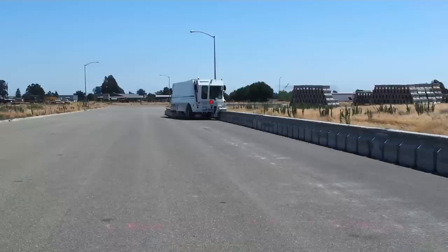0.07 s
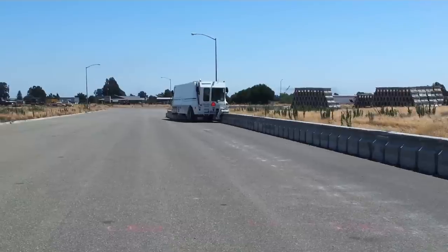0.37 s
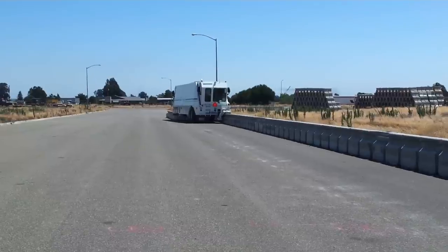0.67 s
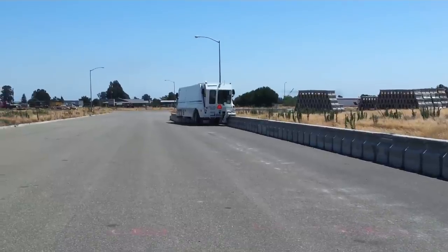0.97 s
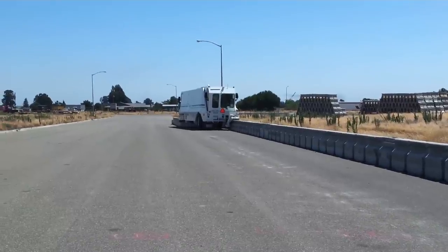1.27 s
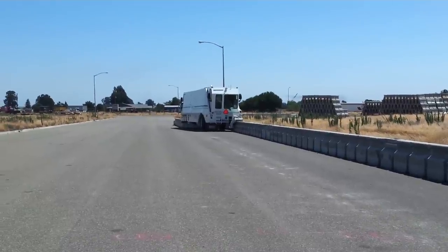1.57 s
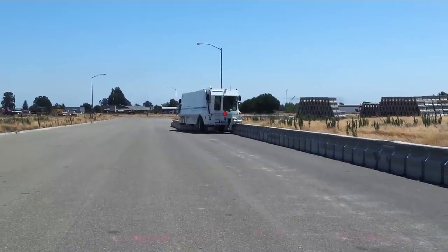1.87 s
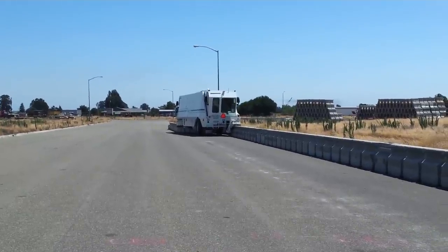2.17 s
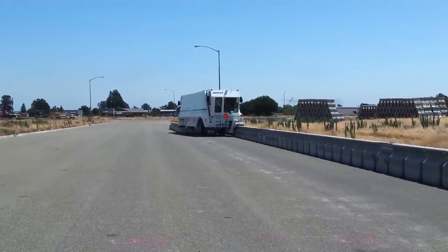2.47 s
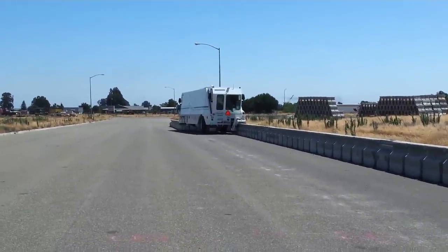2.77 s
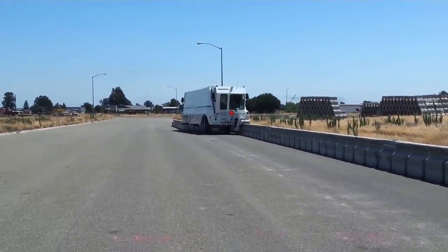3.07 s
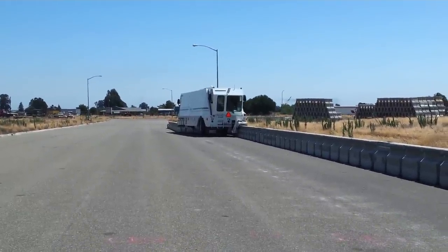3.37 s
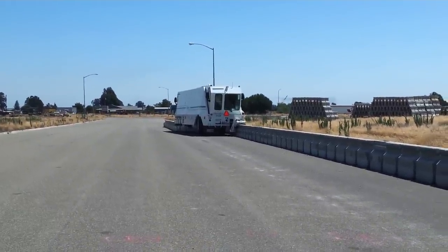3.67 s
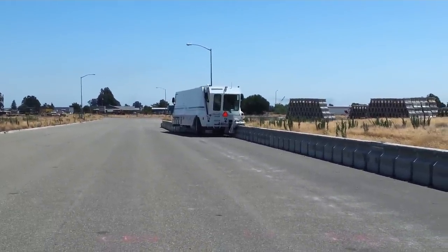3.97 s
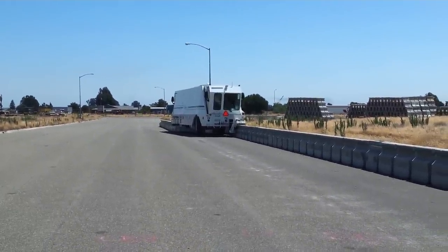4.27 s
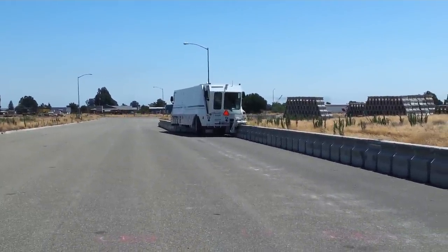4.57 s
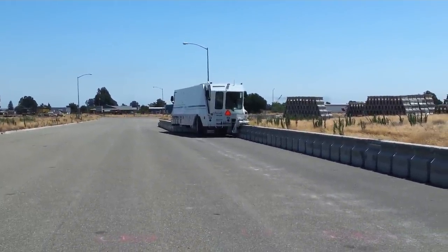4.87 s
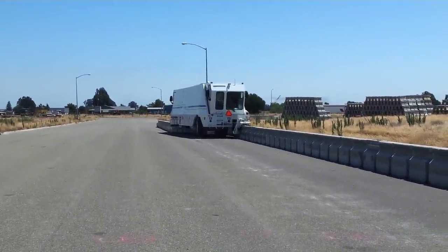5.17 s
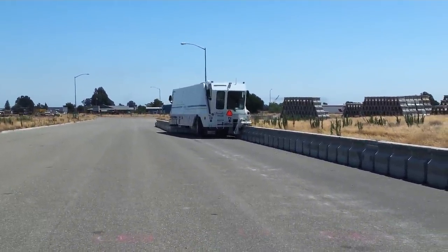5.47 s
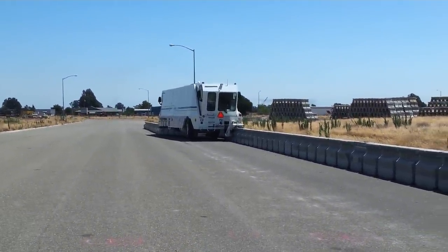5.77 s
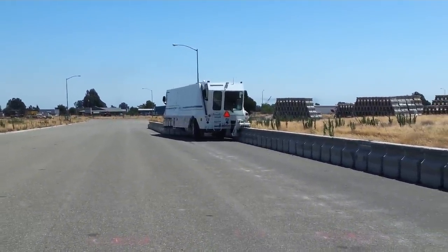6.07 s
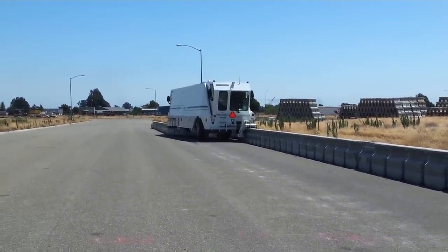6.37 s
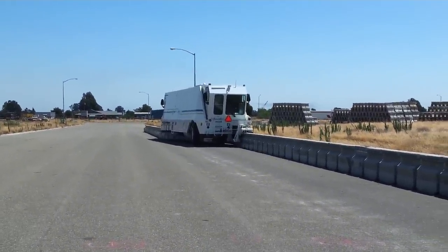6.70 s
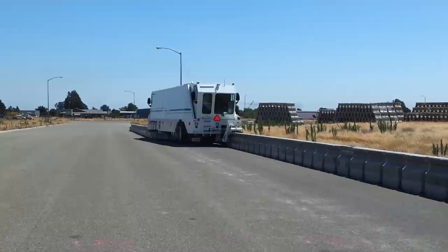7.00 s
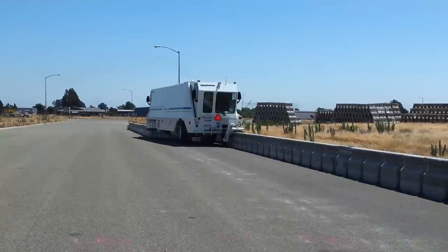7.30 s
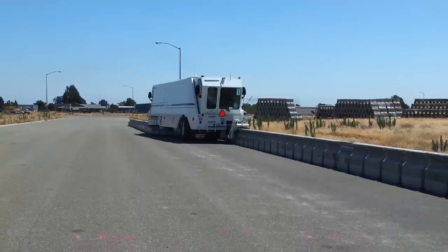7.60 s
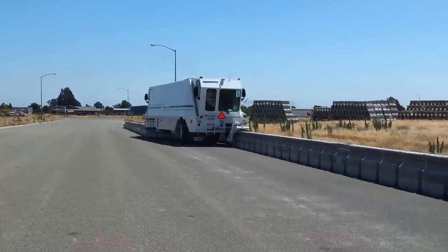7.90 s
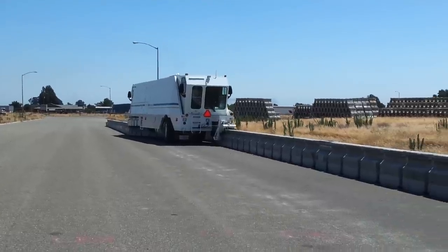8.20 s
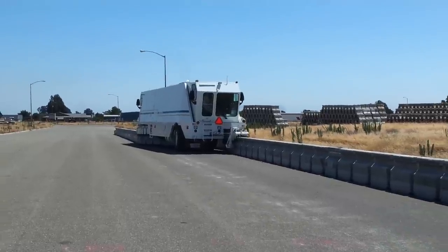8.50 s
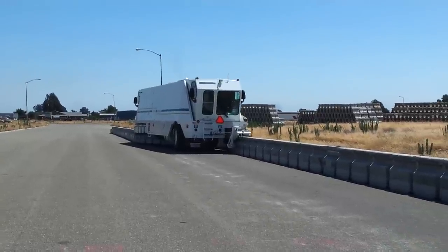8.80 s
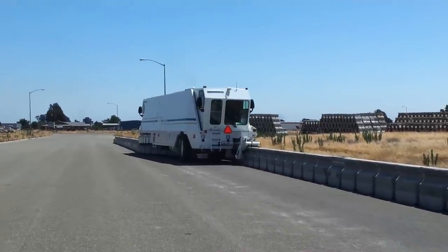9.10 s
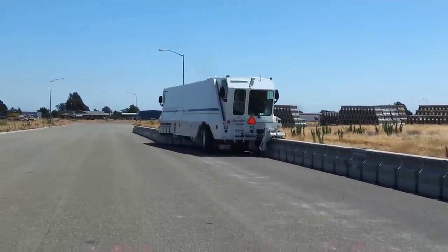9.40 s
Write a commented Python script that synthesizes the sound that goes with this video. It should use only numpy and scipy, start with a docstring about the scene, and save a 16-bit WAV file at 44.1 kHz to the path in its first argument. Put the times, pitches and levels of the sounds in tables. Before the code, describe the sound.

Concrete blocks scrape and knock over the conveyor rollers of a slowly approaching road machine, with jangling steel pins and brief squeaks. Underneath run a steady diesel hum, fan noise and a thin pump whine. The knocks are scattered at first, then come heavier and closer together in the second half. It is outdoors, and gusts thump on the single microphone in the first few seconds and again at the end.

```python
"""A barrier transfer machine creeps towards the microphone along an open paved road.
Linked concrete blocks grind and knock over its conveyor rollers, ringing steel pins and chassis panels.
Under them a six-cylinder diesel drones, its cooling fan rushes and a hydraulic gear pump whines.
One close reflection hollows the clatter; gusts of wind buffet the single microphone."""
import sys
import numpy as np
from scipy import signal
from scipy.fft import rfft, irfft
from scipy.io import wavfile
from scipy.ndimage import map_coordinates

SR = 44100
rng = np.random.default_rng(int(sys.argv[2]) if len(sys.argv) > 2 else 0)


def transcribe(u):
    """Save the signal u as a 16-bit wav file named by the first command-line argument.

    u: samples, shape (n,) or (channels, n), limited to [-1, 1]; the rate is SR.
    q: integer samples, one column per channel.
    """
    v = np.clip(np.atleast_2d(u).T, -1, 1)
    q = np.round(v * 32767).astype(np.int16)
    wavfile.write(sys.argv[1], SR, q)


N = 425565
T = np.arange(N) / SR
BIN_HZ = np.maximum(np.fft.rfftfreq(N, 1 / SR), 1)

# resonance of the blocks and conveyor frame: (frequency [Hz], gain [dB])
FRAME_SPECTRUM = [(60, -22), (130, -3.5), (260, 0.5), (380, 5), (480, -1), (750, 0), (1500, -3),
                  (2200, -2.5), (2850, -5.5), (3500, -10.5), (4600, -13.5), (5250, 0), (6000, -3),
                  (7000, -13.5), (8200, -26), (9000, -28), (10500, -45.5), (11600, -67)]
# steady grinding on the rollers, following the load: (time [s], level [dB])
GRIND_LEVEL = [(0.7, -47.5), (0.9, -51.5), (1.45, -45.5), (1.85, -48.5), (2.2, -48), (2.75, -50.5),
               (3.5, -49.5), (4.15, -48.5), (4.45, -50.5), (5.95, -51), (6.15, -48.5), (6.9, -45.5),
               (7.3, -47.5), (7.55, -43), (7.95, -47.5), (8.28, -42.5), (8.65, -46), (9.64, -45)]
# its colour, relative to that level: (time [s], bass [dB], treble [dB])
GRIND_COLOUR = [(0.7, 0.5, -7), (1.5, -4, -5.5), (2.3, -2, -7.5), (4.6, -2, -5), (6.1, -3.5, -6.5),
                (7.5, -2.5, -4.5), (8.4, -1, -5.5), (8.8, 0, -8.5), (9.6, -5, -9.5)]
# a block drags over the rollers, swelling and easing:
# (time [s], level [dB], half length [s], relative rumble [dB], relative dry scrape [dB])
BLOCK_DRAGS = [(1.05, -47.5, 0.21, -6, -20), (1.317, -50, 0.034, -3, 1), (1.56, -44, 0.05, -8, -3),
               (1.718, -46, 0.043, -11, -3), (1.91, -45.5, 0.085, -11, -9), (2.375, -47, 0.043, -33, -27),
               (2.503, -43, 0.044, -4.5, -8.5), (2.894, -42.5, 0.034, -31, -5),
               (3.316, -44, 0.051, -11, -16), (3.717, -44, 0.1, -4.5, -3.5), (3.818, -44.5, 0.022, -19, -2),
               (4.076, -46, 0.051, -15, -2), (4.35, -44.5, 0.041, -15, -6.5), (6.072, -47, 0.07, -3, -8),
               (6.211, -45.5, 0.063, -7, 1.5), (6.32, -40, 0.035, -5, -6), (6.6, -44.5, 0.043, -2.5, 3),
               (6.696, -49.5, 0.048, -7, 9), (6.829, -39.5, 0.088, -2.5, -3.5),
               (6.983, -41.5, 0.019, -26, 4), (7.035, -38.5, 0.092, -7, -3), (7.48, -56, 0.24, -4, -3),
               (7.62, -54, 0.031, -17, 9), (7.742, -45, 0.045, -1, -4), (7.943, -52.5, 0.021, -11, 4),
               (8.343, -39, 0.033, -11, -3), (8.507, -45.5, 0.082, -7, -4), (8.747, -45.5, 0.062, -1, -10),
               (9.338, -46, 0.062, -4, -2.5)]
# knocks of the linked blocks: (time [s], level [dB], decay t60 [s], relative bass [dB])
BLOCK_KNOCKS = [(0.784, -30, 0.078, -22), (1.472, -25, 0.13, -18), (2.06, -26, 0.24, -22),
                (2.853, -30.5, 1, -27), (3.042, -31, 0.55, -12), (3.257, -25, 0.28, -18),
                (3.793, -30.5, 0.18, -14), (4.806, -30, 0.064, -20), (4.898, -31.5, 0.14, -23),
                (5.234, -27.5, 0.064, -21), (5.267, -27.5, 0.065, -18), (5.283, -29, 0.075, -20),
                (5.303, -25.5, 0.066, -15), (6.012, -25, 0.29, -3.5), (6.261, -25, 0.75, 2),
                (6.305, -24, 0.68, -6), (6.56, -29.5, 0.17, -7), (6.685, -26, 0.12, -6),
                (6.937, -20.5, 0.49, -10), (7.033, -22, 0.069, -3), (7.132, -26.5, 0.18, -5),
                (7.402, -25.5, 0.077, -20), (7.486, -24, 0.56, -14), (7.608, -23, 0.13, -11),
                (7.71, -21, 0.098, -12), (7.969, -27, 0.066, 3), (8.058, -31, 0.16, 5),
                (8.339, -35, .15, -5), (9.572, -30, 0.084, 0)]
# modes of the steel pins and roller brackets: (frequency [Hz], level [dB])
STEEL_MODES = [(740, 0), (880, -3), (1450, -3.5), (1620, 5), (2280, 4), (2780, 5.5), (3420, -2),
               (5270, 1.5), (5480, -3), (6200, -2.5)]
# a pin or bracket struck alone: (time [s], frequency [Hz], level [dB], decay t60 [s])
STEEL_PINGS = [(1.442, 2120, -39, .17), (3.69, 1580, -39, .15), (3.786, 1450, -39.5, .2),
               (3.802, 2324, -36, .19), (5.16, 3345, -48, .1), (6.94, 2780, -36.5, .25),
               (6.948, 1465, -37.5, .3), (7.03, 2630, -37, .14), (9.567, 3175, -36.5, .17)]
# heavy blocks landing on the chassis: (time [s], level [dB], decay t60 [s])
LANDINGS = [(6.263, -43, .35), (6.303, -41.5, 0.37), (6.822, -45.5, 0.36)]
# modes of the chassis panels: (frequency [Hz], level [dB])
PANEL_MODES = [(222, 2.5), (388, 1), (665, 1.5), (797, -9), (1350, 0)]
# rollers chirping under load: (time [s], frequency [Hz], level [dB], half length [s])
ROLLER_CHIRPS = [(1.071, 2915, -45, 0.021), (1.397, 6400, -43, 0.0084), (1.558, 8900, -55, 0.021),
                 (2.285, 6550, -42, 0.005), (2.9, 5250, -39, 0.039), (3.266, 3440, -44, 0.013),
                 (3.67, 1960, -42, 0.029), (4.817, 5270, -41, 0.0072), (6.59, 3390, -42.5, 0.029),
                 (7.144, 6030, -38, 0.0086), (7.412, 5380, -36, 0.014), (7.714, 5200, -37.5, 0.012),
                 (9.068, 3200, -46, 0.022), (9.333, 3190, -51, 0.02)]
# sharp chinks of steel against concrete: (time [s], level [dB])
SHARP_CHINKS = [(6.56, -54), (6.685, -47), (6.939, -48), (6.965, -43), (7.033, -47), (7.075, -48),
                (7.938, -63), (8.059, -46), (8.254, -58), (8.34, -56), (8.515, -51), (8.555, -46),
                (9.25, -50)]
# small chinks in between, clearer at close range: (time [s], level [dB])
SMALL_CHINK_LEVEL = [(0.7, -82), (6.1, -63), (6.6, -60), (7.3, -70), (8.4, -59), (9.6, -77)]
# a valve spits a short, bright hiss of air: (time [s], level [dB], half length [s])
VALVE_SPITS = [(3.661, -61, 0.017)]
# colour of the hiss: (frequency [Hz], gain [dB])
SPIT_SPECTRUM = [(3000, -30), (7000, 2), (9500, 2), (11000, -10), (15500, -12)]
# speed of the diesel: (time [s], firing rate [Hz])
FIRING_RATE = [(0.7, 75.96), (1.1, 77.89), (1.5, 78.62), (2.1, 79.98), (3.3, 80.23), (3.9, 79.89),
               (4.6, 79.05), (5.25, 78.7), (5.6, 77.35), (5.95, 77.3), (6.4, 78.25), (6.9, 78.54),
               (7.4, 79.23), (8.1, 79.61), (9.15, 78.83), (9.6, 79.15)]
# the engine closing on the microphone: (time [s], gain [dB])
APPROACH = [(0.7, -7), (1.5, -6), (3.1, -6.5), (4.5, -2.5), (5.6, -3), (6.7, -1), (8, -3), (9.6, -1.5)]
# exhaust and engine note: (multiple of the crank rate, level [dB])
EXHAUST_ORDERS = [(3, -51.5), (5, -68), (6, -59), (7, -67), (8, -66), (9, -55.5), (10, -69), (11, -58.5),
                  (12, -63.5), (13, -70), (14, -69.5), (18, -68), (22.5, -65.5), (27, -63), (36, -64),
                  (38, -65)]
# the beating hum near 235 Hz: (time [s], gain [dB])
HUM_GAIN = [(0.7, -5), (1.5, 0), (3.9, -2), (4.8, 0.5), (5.8, -0.5), (7.4, 0), (8.3, -0.5), (8.8, 0),
            (9.6, -22)]
# the pump's whine, its second harmonic: (time [s], level [dB])
WHINE_LEVEL = [(.7, -65), (1.6, -57), (2.3, -57), (3.55, -55), (4.15, -61), (4.6, -59.5), (5.15, -53.5),
               (5.5, -61), (6.55, -60.5), (7.3, -56.5), (7.85, -62), (8.4, -54.5), (9.6, -61.5)]
# the pump's fainter tones: (multiple of the tooth rate, level [dB])
PUMP_TONES = [(1, -59), (3, -64.5)]
# rush of the cooling fan and engine bay: (frequency [Hz], gain [dB])
RUSH_SPECTRUM = [(25, -41), (55, -3.5), (100, -2), (200, -5), (320, 5), (450, -8.5), (700, 0.5),
                 (1000, -10), (2200, -1.5), (3500, -33.5), (5500, -3.5), (9000, -26.5), (10600, -33.5),
                 (11800, -53)]
# gusts on the microphone: (time [s], level [dB], half length [s])
WIND_GUSTS = [(0.7, -46.5, 0.09), (0.982, -42, 0.03), (1.047, -39.5, 0.037), (1.123, -50, 0.036),
              (1.6, -44.5, 0.036), (1.69, -43.5, 0.083), (1.872, -40.5, 0.034), (1.97, -45, 0.041),
              (2.278, -52, 0.097), (2.475, -48.5, 0.038), (2.79, -42, 0.042), (2.86, -45, 0.07),
              (2.97, -47.5, 0.04), (3.083, -44.5, 0.026), (3.18, -44, 0.044), (3.253, -46, 0.026),
              (3.42, -49.5, 0.043), (3.81, -44.5, 0.11), (4.103, -43.5, 0.032), (4.386, -51.5, 0.063),
              (4.66, -44, 0.021), (4.895, -52, 0.033), (5.65, -48, 0.045), (6.13, -49, 0.047),
              (6.926, -52.5, 0.14), (7.89, -53, 0.06), (8.177, -51, 0.17), (8.686, -52.5, 0.17),
              (9.17, -50, .04), (9.358, -43.5, 0.027), (9.48, -40.5, 0.022), (9.53, -39, 0.062)]
# colour of their buffeting: (frequency [Hz], gain [dB])
BUFFET_SPECTRUM = [(20, -56), (32, -38), (50, -7.5), (80, -0.5), (125, -1.5), (190, 0), (260, -7),
                   (345, -5.5), (430, -12.5), (700, -18.5), (2000, -84), (8000, -110)]
# the wind's deepest bass: (time [s], gain [dB])
WIND_BASS = [(0.7, 0), (1.05, 8), (1.35, 8), (1.9, 5), (2.4, 11.5), (3, 7), (3.9, -9), (4.8, -3), (6.2, 1),
             (7.3, -11), (7.9, 8), (8.7, -3), (9.3, 1), (9.6, 12)]
# single strong eddies on the microphone: (time [s], level [dB], frequency [Hz])
EDDIES = [(1.054, -30, 170), (1.676, -28, 151), (1.853, -26, 110), (1.876, -31, 96), (1.902, -23.5, 109),
          (2.489, -28.5, 150), (2.772, -32, 190), (2.82, -37, 150), (2.889, -28, 160), (3.183, -31, 210),
          (9.473, -25, 200), (9.487, -24, 520), (9.515, -28, 250)]


def conveyor(judder_db=1.22, flutter_db=0.5, fits_db=0.5, jangle_db=-8):
    """Concrete crunches over the rollers, louder under load; a dragging block adds rumble and scrape."""
    crunch = grains(rate=1800, spread_db=0) + rng.standard_normal(N)
    frame = colour(crunch * undb(judder_db * walk(45) + flutter_db * walk(220)), FRAME_SPECTRUM)
    low, low_and_mid = below(frame, 1214), below(frame, 3640)
    mid, high = unit(low_and_mid - low), unit(frame - low_and_mid)
    low = low / band_rms(low, 660, 1050)
    load_db = curve(GRIND_LEVEL)[0] + fits_db * walk(13)
    bass_db, treble_db = curve(GRIND_COLOUR)
    times, drag_db, lengths, rumble_db, scrape_db = np.transpose(BLOCK_DRAGS)
    rumble = swells(load_db + bass_db, zip(times, drag_db + rumble_db, lengths))
    grind = swells(load_db, zip(times, drag_db, lengths))
    scrape = swells(load_db + treble_db, zip(times, drag_db + scrape_db, lengths))
    return (rumble * undb(-5 + 0.24 * walk(22)) * low
            + grind * (undb(-1.26) * mid + undb(jangle_db) * jangle())
            + scrape * undb(1.5 * walk(50)) * high)


def knocks(rattle_db=-13, bass_hz=1000, crack_s=0.0024):
    """Each block lands with a crack and a short, bright rattle of its pins; a heavy one has more bass."""
    force, heavy = np.zeros(N), np.zeros(N)
    rattle = grains(rate=12000, spread_db=2)
    age = T[:SR // 2]
    for s, db, t60, bass_db in BLOCK_KNOCKS:
        fade = decay(age, t60) + 0.22 * np.exp(-age / crack_s)
        burst = rattle[int(s * SR):][:len(age)]
        blow = undb(db + rattle_db) * fade[:len(burst)] * burst
        add(force, s, blow)
        add(heavy, s, undb(bass_db) * blow)
    force += below(heavy - force, bass_hz, order=4)
    return colour(force, FRAME_SPECTRUM) / np.std(colour(rattle, FRAME_SPECTRUM))


def clangs(clang_db=-27, t60=0.13, scatter_db=4, detune=0.034):
    """Every knock also rings the steel, with a balance and pitch that vary from blow to blow."""
    out, age = np.zeros(N), T[:SR // 3]
    hz, mode_db = np.transpose(STEEL_MODES)[:, :, None]
    for s, db, _, _ in BLOCK_KNOCKS:
        balance, shift = rng.standard_normal((2, len(STEEL_MODES), 1))
        gains = undb(mode_db + scatter_db * np.tanh(balance))
        modes = gains * np.sin(2 * np.pi * hz * (1 + detune * shift) * age)
        add(out, s, undb(db + clang_db) * modes.sum(axis=0) * decay(age, t60))
    return out


def jangle(t60=0.13, detune=0.044, range_db=3, count=1800):
    """Loose steel parts are tapped at random, each tap ringing at a pitch of its own."""
    out = np.zeros(N)
    for when, which, shift, size in rng.random((count, 4)):
        hz, mode_db = STEEL_MODES[int(which * len(STEEL_MODES))]
        tap = ring(hz * (1 + detune * (2 * shift - 1)), t60, attack_s=0.0003)
        add(out, when * T[-1], undb(mode_db + range_db * size) * tap)
    return unit(out)


def pings(attack_s=0.002, buzz=0.44, buzz_hz=220):
    """Single steel parts ring out above the clatter, buzzing a little in their seats."""
    out = np.zeros(N)
    for s, hz, db, t60 in STEEL_PINGS:
        add(out, s, undb(db) * ring(hz, t60, attack_s))
    return out * (1 + buzz * walk(buzz_hz))


def booms(attack_s=0.0017, detune=0.02):
    """A heavy block lands and the chassis panels clunk, a little differently each time."""
    out = np.zeros(N)
    for s, db, t60 in LANDINGS:
        for hz, mode_db in PANEL_MODES:
            panel = ring(hz * (1 + detune * rng.standard_normal()), t60, attack_s)
            add(out, s, undb(db + mode_db) * panel)
    return out


def chirps(width_hz=240):
    """A slipping roller sings briefly at one unsteady pitch."""
    unsteady = unit(below(rng.standard_normal(N), width_hz, order=2))
    return unsteady * sum(undb(db) * bell(s, length, reach=2) * np.sin(2 * np.pi * hz * T)
                          for s, hz, db, length in ROLLER_CHIRPS)


def chinks(lo_hz=6700, hi_hz=9700, t60=0.065, spread_db=2.8, tilt_db_per_khz=-3, count=480):
    """Steel clips the concrete; every chink rings with five high modes of its own, the highest weakest."""
    out, age = np.zeros(N), T[:SR // 8]
    fade = (1 - np.exp(-age / 0.0012)) * decay(age, t60)
    times = rng.uniform(0, T[-1], count)
    size = np.minimum(rng.exponential(size=count), 3)
    small_db = np.interp(times, *np.transpose(SMALL_CHINK_LEVEL)) + spread_db * size
    for s, db in [*zip(times, small_db), *SHARP_CHINKS]:
        hz = rng.uniform(lo_hz, hi_hz, size=(5, 1))
        gains = undb(tilt_db_per_khz * (hz - lo_hz) / 1000) / 2
        modes = gains * np.sin(2 * np.pi * hz * age)
        add(out, s, undb(db) * modes.sum(axis=0) * fade)
    return out


def spits():
    """A valve spits a brief, very bright hiss of air."""
    spray = unit(colour(grains(rate=3000, spread_db=-4), SPIT_SPECTRUM))
    return spray * sum(undb(db) * bell(s, length) for s, db, length in VALVE_SPITS)


def diesel(firings, near_db, waver_db=1, jitter_rad=0.018, second_hum_db=-53, beat_s=0.868, null_s=5.27):
    """Three firings a crank turn; a second hum, slightly higher, beats against the ninth harmonic."""
    crank = 2 * np.pi * firings / 3 + jitter_rad * walk(9)
    hum_db, = curve(HUM_GAIN)
    exhaust = 0
    for multiple, db in EXHAUST_ORDERS:
        level_db = db + hum_db if multiple == 9 else db
        exhaust += undb(level_db + waver_db * walk(4)) * np.sin(multiple * crank)
    slip = 2 * np.pi * (T - null_s) / beat_s
    second_hum = -undb(second_hum_db + hum_db) * np.sin(9 * crank + slip)
    return np.sqrt(2) * (exhaust + second_hum) * undb(near_db)


def pump(firings, near_db, teeth_per_firing=4.035, waver_db=2.2, jitter_rad=0.096):
    """A gear pump runs in step with the engine; its second harmonic whines above the others."""
    tooth = 2 * np.pi * teeth_per_firing * firings + jitter_rad * walk(10)
    out = undb(curve(WHINE_LEVEL)[0] + waver_db * walk(14)) * np.sin(2 * tooth)
    for multiple, db in PUMP_TONES:
        out += undb(db + near_db + waver_db * walk(4.2)) * np.sin(multiple * tooth)
    return np.sqrt(2) * out


def engine_bay(firings, near_db, level_db=-51.5, throb=0.45, waver_db=1):
    """Fan rush and combustion noise, throbbing with the firings."""
    noise = rng.standard_normal(N) * (1 + throb * np.cos(2 * np.pi * firings))
    return unit(colour(noise, RUSH_SPECTRUM)) * undb(level_db + near_db + waver_db * walk(10))


def reflection(x, share=0.56, dull_hz=5200, turn_rad=0.41):
    """A hard surface returns the sound about 1.4 ms late, duller and turned in phase."""
    lag_ms = np.interp(T, [0, 6, 7.8, 9.65], [1.422, 1.422, 1.408, 1.3])  # shifts as the machine nears
    echo = np.real(signal.hilbert(below(x, dull_hz, order=4)) * np.exp(1j * turn_rad))
    late = np.interp(T - lag_ms / 1000, T, echo)
    return (x + share * late) / np.sqrt(1 + share ** 2)


def wind(breeze_db=-60, swing_db=3.5, eddy_db=2, strong_db=-41):
    """Gusts over a light breeze buffet the microphone; strong ones reach higher in pitch."""
    strength = swells(breeze_db + swing_db * walk(9), WIND_GUSTS)
    buffet = colour(rng.standard_normal(N) * undb(eddy_db * walk(90)), BUFFET_SPECTRUM)
    buffet /= band_rms(buffet, 95, 215)
    bass_gain = undb(curve(WIND_BASS)[0])
    deep = below(buffet, 380, order=4) + (bass_gain - 1) * below(buffet, 115, order=4)
    small_eddies = (strength / undb(strong_db)) ** 0.77  # carried by the faster gusts
    return strength * (deep + (buffet - deep) * small_eddies)


def thumps(port_hz=60, blunt=0.33):
    """An eddy hits the microphone port: a pointed push of pressure with a suck on either side."""
    out = np.zeros(N)
    for s, db, hz in EDDIES:
        near = np.abs(T - s) < 2 / hz
        spread = np.hypot(2 * np.pi * hz * (T[near] - s), blunt)
        push = (1 - spread) * np.exp(-spread)
        out[near] += undb(db) * push / push.max()
    return out - below(out, port_hz)  # the deepest part is lost


def undb(db):
    """Decibels to gain."""
    return 10 ** (np.asarray(db) / 20)


def unit(x):
    """Scale to rms 1."""
    return x / np.std(x)


def curve(table):
    """The columns of a table, joined by straight lines in time."""
    times, *columns = np.transpose(table)
    return [np.interp(T, times, column) for column in columns]


def colour(x, points):
    """Minimum-phase filter through points of (frequency [Hz], gain [dB])."""
    hz, db = np.transpose(points)
    gain = undb(np.interp(np.log(BIN_HZ), np.log(hz), db))
    cepstrum = irfft(np.log(gain), N)
    cepstrum[1:N // 2] *= 2
    cepstrum[N // 2:] = 0
    return irfft(rfft(x) * np.exp(rfft(cepstrum)), N)


def below(x, hz, order=8):
    """The part of a sound under a frequency."""
    return irfft(rfft(x) / (1 + (BIN_HZ / hz) ** order), N)


def band_rms(x, lo_hz, hi_hz):
    """Rms between two frequencies."""
    return np.std(irfft(rfft(x) * ((BIN_HZ > lo_hz) & (BIN_HZ < hi_hz)), N))


def walk(rate):
    """Smooth random wander with a spread of 1, at `rate` steps a second."""
    return unit(map_coordinates(rng.standard_normal(4096), [T * rate], order=3, mode="wrap"))


def grains(rate, spread_db):
    """Random clicks, `rate` a second, their sizes scattered by spread_db."""
    hits = rng.random(N) < rate / SR
    size = np.minimum(rng.exponential(size=N), 5)
    return unit(hits * undb(spread_db * size) * rng.choice([-1, 1], N))


def bell(s, length, reach=np.inf):
    """Bell-shaped gain around a time, cut off `reach` half lengths away."""
    offset = (T - s) / length
    return np.exp(-offset ** 2) * (np.abs(offset) < reach)


def swells(steady_db, events):
    """Gain of a steady level plus swells (time [s], level [dB], half length [s]), summed in power."""
    power = sum((undb(db) * bell(s, length, reach=3)) ** 2 for s, db, length in events)
    return np.sqrt(undb(steady_db) ** 2 + power)


def decay(age, t60):
    """A fall of 60 dB every t60 seconds."""
    return np.exp(-np.log(1000) * age / t60)


def ring(hz, t60, attack_s):
    """Half a second of one struck mode."""
    age = T[:SR // 2]
    return np.sin(2 * np.pi * hz * age) * (1 - np.exp(-age / attack_s)) * decay(age, t60)


def add(out, s, sound):
    """Mix a sound in at a time."""
    part = out[int(s * SR):][:len(sound)]
    part += sound[:len(part)]


def scene(treble_cut_hz=10900):
    """The machine straight ahead, its treble cut steeply above 11 kHz; wind at the microphone."""
    firings = np.cumsum(curve(FIRING_RATE)[0]) / SR
    near_db, = curve(APPROACH)
    clatter = reflection(conveyor() + knocks() + clangs() + chirps() + engine_bay(firings, near_db))
    machine = clatter + chinks() + pings() + booms() + diesel(firings, near_db) + pump(firings, near_db)
    mono = below(machine, treble_cut_hz, order=40) + spits() + wind() + thumps()
    return np.array([mono, mono])


def record(dry, start_s=0.677, top_hz=15800):
    """The microphone opens after a moment of silence; the top treble is cut steeply."""
    lowpass = signal.ellip(8, 0.2, 70, top_hz, fs=SR, output="sos")
    return signal.sosfilt(lowpass, dry * (T >= start_s))


dry = scene()
out = record(dry)
transcribe(out)
```